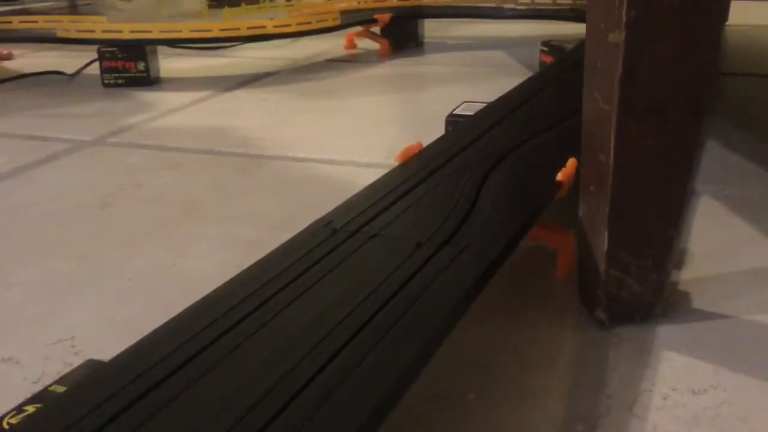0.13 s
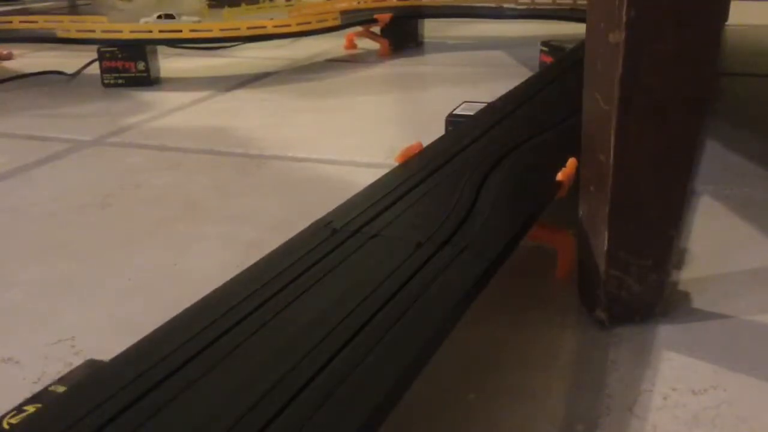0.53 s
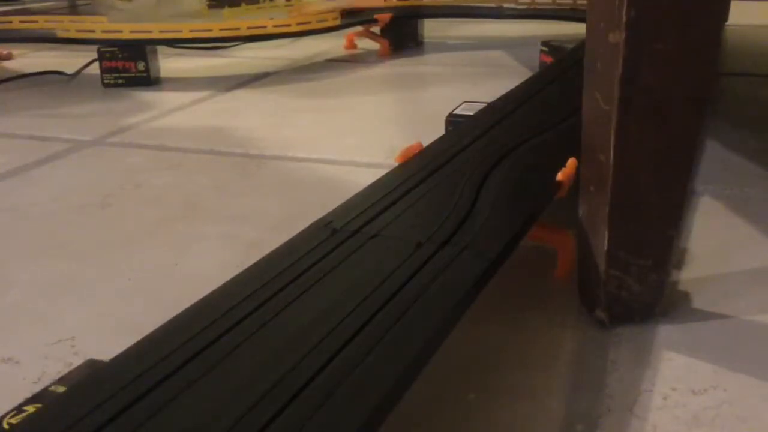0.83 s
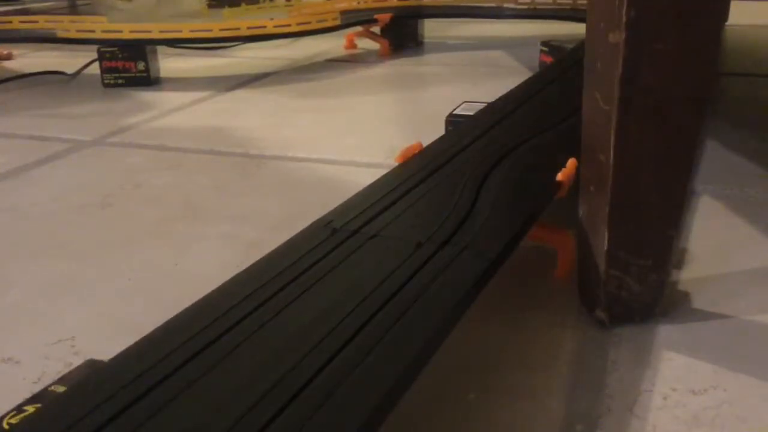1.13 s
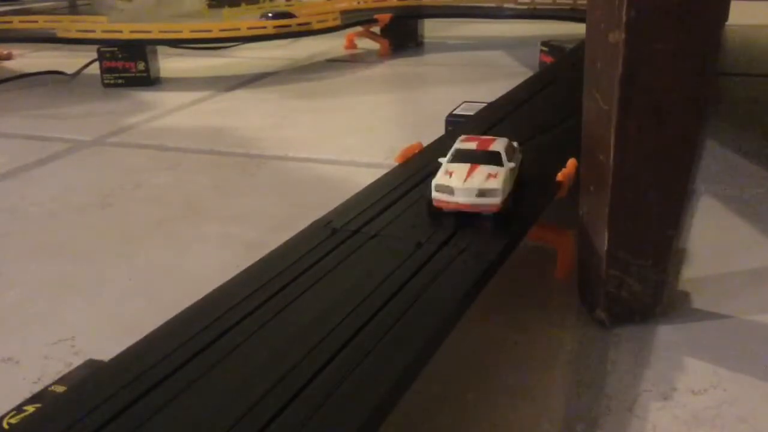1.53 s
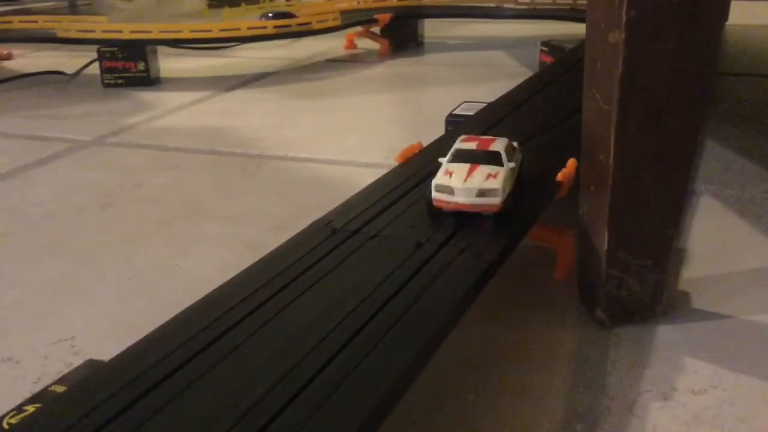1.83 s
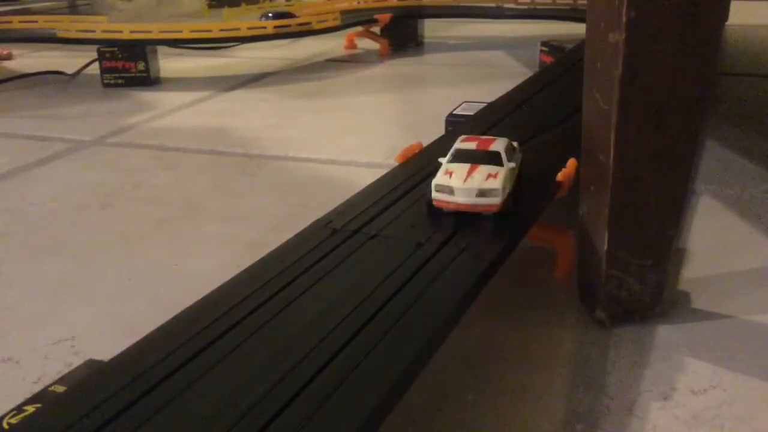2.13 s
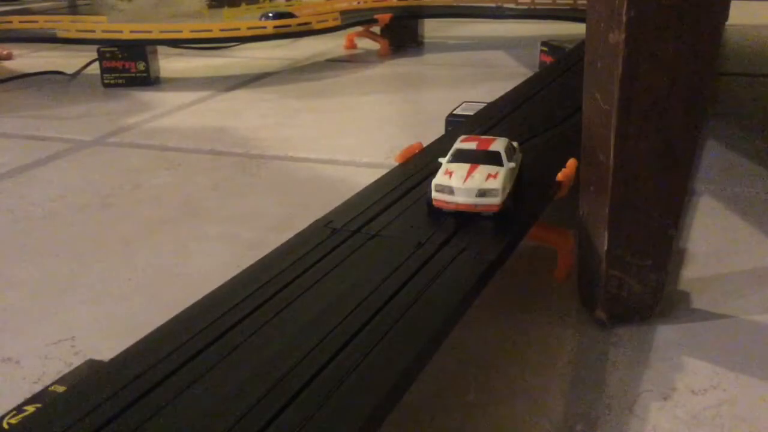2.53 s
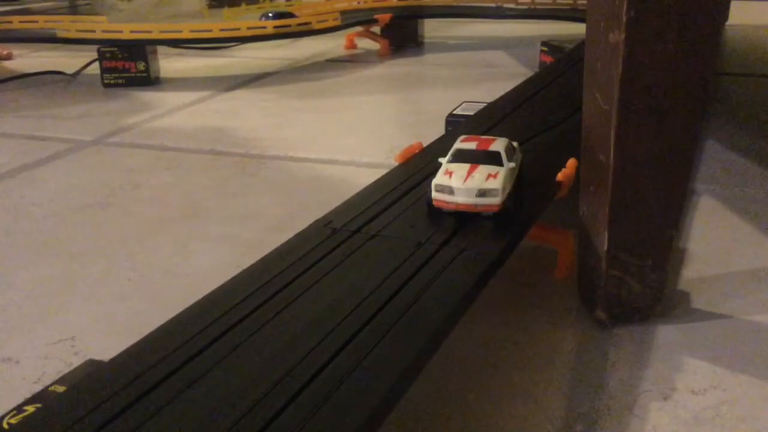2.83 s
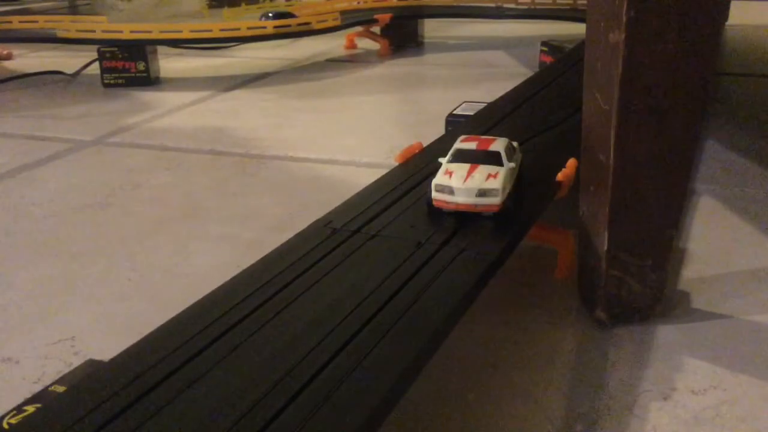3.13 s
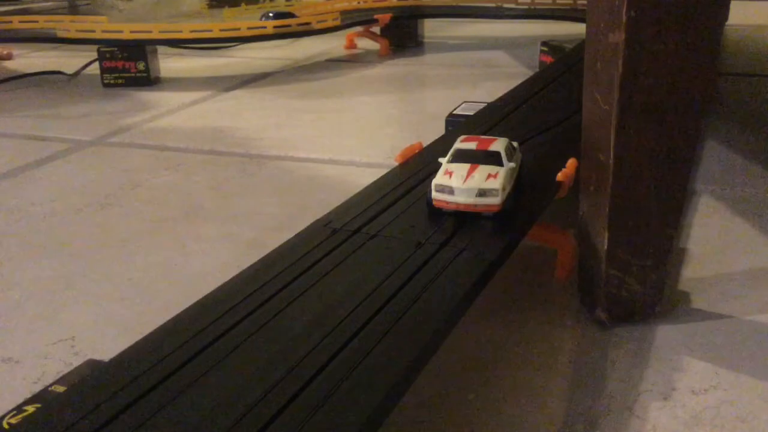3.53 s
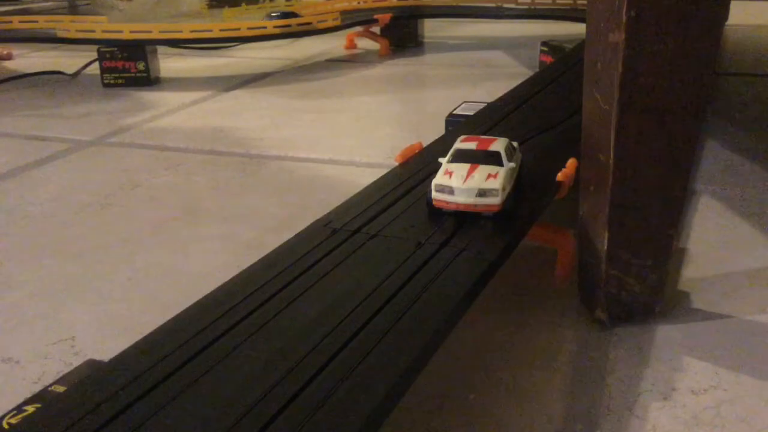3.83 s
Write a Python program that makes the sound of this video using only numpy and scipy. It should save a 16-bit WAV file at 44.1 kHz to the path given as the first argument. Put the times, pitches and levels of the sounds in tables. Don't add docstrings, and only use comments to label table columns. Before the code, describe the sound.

A toy slot car whirs and rattles along plastic track twice, then stops, leaving faint rumble.

```python
import sys
import numpy as np
from scipy import signal
from scipy.io import wavfile

SR = 44100
rng = np.random.default_rng(int(sys.argv[2]) if len(sys.argv) > 2 else 0)


def undo_db(level):
    steps = np.asarray(level, float) / 20
    return 10 ** steps


def digitize_waveform(pressure):
    field = np.atleast_2d(pressure).T
    bounded = np.clip(field, -1, 1)
    quanta = np.round(bounded * 32767).astype(np.int16)
    wavfile.write(sys.argv[1], SR, quanta)


N = 176400
T = np.arange(N) / SR

# f/Hz, width/Hz, level/dB
BODY = [(284.3, 25, -10.5), (337, 87, -11), (407, 110, -12.5), (918, 370, -6), (1400, 200, -9),
        (1566, 57, -8.5), (1737, 180, -2.5), (1960, 110, 0), (2150, 220, -6), (3700, 360, -14),
        (4360, 400, -18), (7100, 860, -16)]


def rms_one(x):
    return x / np.sqrt(np.mean(x ** 2) + 1e-20)


def in_time(rows):
    s, *columns = np.transpose(rows)
    return [np.interp(T, s, column) for column in columns]


def drift(rate_hz):
    step = 20
    r = np.exp(-2 * np.pi * step * rate_hz / SR)
    noise = rng.standard_normal(N // step + 3002)
    slow = signal.lfilter([1], [1, -2 * r, r * r], noise)[3000:]
    return np.interp(np.arange(N) / step, np.arange(len(slow)), rms_one(slow))


def resonate(x, hz, width_hz):
    r = np.exp(-np.pi * width_hz / SR)
    feed = np.array([1, 0, -1]) * (1 - r * r) / 2
    return signal.lfilter(feed, [1, -2 * r * np.cos(2 * np.pi * hz / SR), r * r], x + 1e-18)


def bandpass(x, order, low_hz, high_hz):
    return signal.sosfilt(signal.butter(order, [low_hz, high_hz], "band", fs=SR, output="sos"), x)


def bands(spectrum, patchy_db, moving_db, size=N):
    hz, db = np.transpose(spectrum)
    white = rng.standard_normal((2, size + SR // 2))
    out, power = np.zeros(N), 0
    edges = 9.35 * 2 ** np.arange(0, 11, .4)
    for k, (low, high) in enumerate(zip(edges, edges[1:])):
        mid = np.sqrt(low * high)
        if not hz[0] / 1.2 < mid < hz[-1] * 1.3:
            continue
        gain = undo_db(np.interp(np.log(mid), np.log(hz), db))
        band = bandpass(white[k % 2], 3, low, high)[SR // 2:]
        flicker_db = patchy_db * np.clip(drift(12)[:size], -2, 2) / (1 + mid / 9000)
        out[:size] += gain * band * undo_db(flicker_db + moving_db(mid)[:size])
        power += gain ** 2 * (high - low) * 2 / SR
    return out / np.sqrt(power)


def tones(rows, wobble_db):
    out = np.zeros(N)
    for s, length, hz, db, glide in rows:
        span = slice(int(s * SR) + 1, int((s + length) * SR))
        age = T[span] - s
        swell, sway = drift(20)[span], drift(20)[span]
        edge = np.sin(np.pi * age / length) ** 0.48
        turn = 2 * np.pi * (hz + glide * age / 2) * age
        out[span] += undo_db(db + 3.5 + wobble_db * swell) * edge * np.sin(turn + 0.18 * wobble_db * sway)
    return out


def tilt(hz, bright_db, boom_db, tyre_db):
    octaves = np.log2(hz / 2000)
    treble = bright_db * np.clip(5.0 * octaves - .9, 0, 1.5 + .2 * octaves)
    bass = boom_db * np.clip(-octaves / 2, 0, 1)
    return treble + bass + tyre_db * np.exp(-((octaves + 1.2) / .8) ** 2)


def car():
    # t/s, level/dB, nearness as brightness/dB, load as boom/dB, tyre rumble/dB
    effort = [
        [(0, -38.5, 5, -3, 3.5), (.07, -38, 0.5, 2.5, -4.5), (.2, -39, 1, 5.5, -3), (.37, -40, 3, 6, -2),
         (.44, -34, 1, -0.5, 0.5), (.51, -39.5, 3.5, -1, 1.5), (.59, -54, 2, 3.5, 3), (.68, -57.5, -1, 8.5, 0),
         (.76, -60.5, 7.5, 11.5, 2.5)],
        [(.81, -43.5, 0, -2, 10.5), (.92, -39.5, 1, 0.5, -6), (.97, -40, 2, 3, 1.5), (1.14, -37, -0.5, -3, -2),
         (1.19, -37.5, 1.5, -4, -4), (1.28, -43, 1.5, 4.5, 0), (1.41, -45.5, 4, 6, -2.5),
         (1.5, -62.5, 3, 6.5, 1), (1.62, -78.5, 8.5, 25, -4)],
    ]
    # f/Hz, level per Hz/dB
    hiss_colour = [(71, -52.5), (120, -18.5), (334, -3), (670, -8.5), (2150, -1.5), (3110, -12.5),
                   (3740, -17), (5190, -21), (16000, -25.5)]
    # f/Hz, width/Hz, level/dB
    track_modes = [(520, 13.4, -15), (938, 24, -11.5), (1306, 25, -19), (1752, 29, -9), (2106, 24.2, -6.5)]
    contacts_per_s, contact_spread_db = 1200, 3.0
    hiss_db, track_db, rattle_db = -3.5, -5.5, -8.5

    level_db, bright_db, boom_db, tyre_db = in_time(effort[0] + effort[1])
    bright_db = bright_db + 0.17 * (level_db + 40.5)

    def colour(hz):
        return tilt(hz, bright_db, boom_db, tyre_db)

    hiss = bands(hiss_colour, 3.5, colour, size=N // 2)
    sizes = undo_db(contact_spread_db * np.minimum(rng.exponential(1, N), 4)) * rng.choice([-1, 1], N)
    clicks = sizes * (rng.random(N) < contacts_per_s * undo_db(3 * drift(30)) / SR)

    def rung(hz, width):
        return rms_one(resonate(clicks * rng.standard_normal(N), hz, width))

    rattle = sum(undo_db(db + colour(hz)) * rung(hz, width) for hz, width, db in BODY)
    track = sum(undo_db(db + 5 * drift(4.1) + colour(hz)) * rung(hz, width) for hz, width, db in track_modes)
    return undo_db(level_db) * (undo_db(hiss_db) * hiss + undo_db(track_db) * track + undo_db(rattle_db) * rattle)


def gear():
    # t/s, centre f/Hz, level/dB
    mesh = [
        [(0, 3700, -50), (.4, 3900, -52.5), (.48, 4000, -33), (.56, 3760, -61.5), (.7, 3670, -96)],
        [(.79, 3520, -85), (.83, 3520, -46.5), (.92, 3941, -47), (1.0, 3800, -55), (1.25, 3757, -57.5),
         (1.4, 3762, -48), (1.52, 3604, -77.5)],
    ]
    hz, db = in_time(mesh[0] + mesh[1])
    half_width = signal.butter(2, 410, fs=SR, output="sos")
    rough = signal.sosfilt(half_width, rng.standard_normal((2, N)))
    turn = 2 * np.pi * np.cumsum(hz) / SR
    whine = rms_one(rough[0] * np.cos(turn) + rough[1] * np.sin(turn))
    return undo_db(db - 2.5 + 2.62 * drift(23.4)) * whine


def live_room():
    # f/Hz, level/dB
    hum_tones = [(88, -70.5), (180, -59)]
    # f/Hz, level per Hz/dB
    air_colour = [(12, -74.5), (20, -46.5), (81, -7), (145, -19), (181, -1), (620, -8), (2240, -26.5),
                  (2570, -30), (15800, -44.5)]
    hum = np.zeros(N)
    for hz, db in hum_tones:
        hum += undo_db(db - 1.0 + 4.0 * drift(10.0)) * np.sin(2 * np.pi * hz * T + 0.94 * drift(3.3))
    fading_db = -150 * np.maximum(T - 1.42, 0)

    def fade(hz):
        return np.maximum(fading_db, -22 / (1 + (hz / 4000) ** 2) - 6)

    return undo_db(-63) * bands(air_colour, 1.5, fade, size=N // 2) + hum


def joints():
    # t/s, peak level/dB, brightness/dB
    joint_hits = [(0.004, -25.5, 6.5), (0.111, -26, 6), (0.139, -15.5, -0.5), (0.235, -24.5, -5),
                  (0.308, -16.5, -4), (0.401, -24.5, 6.5), (0.447, -17, -12), (0.473, -21, -4),
                  (0.485, -29, 0), (0.5, -22, 4), (0.798, -35, 0), (0.806, -26, 5), (0.879, -30.5, 5),
                  (1.011, -18, -3.5), (1.1561, -12, 3.5), (1.321, -30, 0)]
    attack_s, t60_s, tail_t60_s, tail_db = .0007, 0.015, 0.17, -1.5
    body_db, crack_db = -24.5, -21.5
    knock, crack = np.zeros(N), np.zeros(N)
    for s, db, bright_db in joint_hits:
        span = slice(int(s * SR) + 1, int((s + .4) * SR))
        age = T[span] - s
        decay = undo_db(-60 * age / t60_s) + undo_db(tail_db - 60 * age / tail_t60_s)
        shape = np.minimum(age / attack_s, 1) * undo_db(db) * decay
        knock[span] += shape
        crack[span] += shape * undo_db(bright_db)
    body = np.zeros(N)
    for hz, width, db in BODY[:11]:
        body += undo_db(db) * resonate(knock * rng.standard_normal(N), hz, width) * np.sqrt(SR / width)
    top = bandpass(crack * rng.standard_normal(N), 2, 5300, 15000)
    return undo_db(body_db) * body + undo_db(crack_db) * top


def ring(s, db, hz, t60_s):
    out = np.zeros(N)
    span = slice(int(s * SR) + 1, int((s + t60_s * 2) * SR))
    age = T[span] - s
    out[span] = undo_db(db - 60 * age / t60_s) * np.minimum(age * hz, 1) * np.sin(2 * np.pi * hz * age)
    return out


def ticks():
    # t/s, peak level/dB, f/Hz
    contacts = [(.020, -29, 1515), (.114, -25, 1960), (.1395, -16.5, 1980), (0.1446, -23, 1790),
                (.173, -23.5, 1920), (0.3082, -29, 1570), (.401, -37, 2040), (0.4143, -25, 1910),
                (0.432, -31, 1860), (.4475, -26, 1760), (0.474, -24, 2000), (.501, -28, 1500),
                (.512, -24.5, 1300), (0.7684, -41, 2100), (.798, -31.5, 1820), (.810, -31, 1860),
                (1.011, -23.5, 2000), (1.051, -22, 1900), (1.137, -28, 2080), (1.1565, -17.5, 1810),
                (1.164, -23, 1630), (1.264, -29, 1300), (1.322, -30, 1890), (1.409, -29, 1570)]
    out = np.zeros(N)
    for s, db, hz in contacts:
        out += ring(s, db, hz, .018)
        out += ring(s, db - 9, 1000 * rng.uniform(0.66, 1.2), .015)
    return undo_db(-2.5) * out


def dipped(x):
    # f/Hz, width/Hz, depth/0-1
    weak_spots = [(3140, 530, 0.4), (5180, 510, 0.3), (11600, 2500, 0.5)]
    for hz, width, depth in weak_spots:
        x = x - np.clip(depth, 0, 1) * resonate(x, hz, width)
    return signal.sosfilt(signal.butter(2, 110, "high", fs=SR, output="sos"), x)


def motor_whirs():
    # start t/s, length/s, f/Hz, level/dB, glide/Hz per s
    notes_sung = [(.17, .13, 300, -48, 600), (.33, .08, 355, -45, -100), (.56, .065, 285, -48, 0),
                  (.4, .035, 2000, -37, -3000), (.425, .035, 1800, -35, -300), (.78, .1, 420, -50, -200),
                  (.915, .035, 350, -43, -300), (.885, .035, 1770, -41, 0), (1.05, .09, 1215, -46, 200),
                  (1.15, .17, 1560, -51, -100), (1.2, .045, 350, -44, 0), (1.22, .18, 740, -53, -150),
                  (1.345, .09, 430, -51, 100), (1.31, .08, 1950, -48, -3500), (1.46, .07, 440, -58, 0),
                  (1.17, .04, 1960, -39, 900), (1.06, .07, 2150, -45, -900),
                  (1.335, .08, 3750, -57, -10000), (1.375, .1, 1580, -55, -400), (.95, .045, 930, -48, 0),
                  (.68, .05, 2300, -58, -1000), (.6, .1, 1680, -60, 0), (1.37, .05, 3600, -59, -8000),
                  (.05, .11, 880, -53, 300), (.18, .06, 1990, -46, 400), (1.3, .07, 310, -49, 0)]
    return tones(notes_sung, 3.2)


def room_rumble():
    # f/Hz, level per Hz/dB
    rumble_colour = [(7.1, -13.0), (12, 2.0), (34, -12), (82, -25), (140, -20.5), (204, -30), (291, -30),
                     (545, -41.0), (1750, -49.0), (2280, -82), (3850, -120)][:-2]
    # t/s, level/dB
    swell_points = [
        (1.55, -58),
        (1.75, -59),
        (2.1, -66),
        (2.9, -72),
        (3.4, -66),
        (4, -60),
    ]
    swell_db, = in_time(swell_points)

    def swell(hz):
        return (swell_db + 71.5) * 1.2 * (hz > 50) / (1 + (hz / 466) ** 2)

    return undo_db(-59.5) * bands(rumble_colour, 2.8, swell)


def far_engine():
    # t/s, f/Hz, level/dB
    engine_run = [
        (1.55, 36, -55),
        (1.95, 35.46, -58),
        (2.15, 35.01, -64.5),
        (3.4, 26.94, -57),
        (3.56, 28.51, -43),
        (3.7, 30.12, -43),
        (3.8, 32.64, -38.5),
        (4, 32.43, -37.5),
    ]
    # multiple of the turning rate, level/dB
    orders = [(1, 0), (3.5, -25), (5, -22.5), (6.3, -20.5), (7.6, -26), (8.6, -23), (13, -33)]
    hz, db = in_time(engine_run)
    turn = 2 * np.pi * np.cumsum(hz) / SR
    load_db = 58 * np.minimum(T - 3.91, 0)
    out = np.zeros(N)
    for multiple, order_db in orders:
        change_db = (multiple > 1) * (2.6 * drift(10.0) + load_db)
        out += undo_db(db + 2.5 + order_db + change_db) * np.sin(multiple * turn)
    return out


def passing_drones():
    # start t/s, length/s, f/Hz, level/dB, glide/Hz per s
    passes = [
        (3.1, 0.64, 75, -58.5, 12),
        (2.8, 0.56, 170, -67, -1.5),
        (3.5, 0.22, 58, -51, 29.5),
        (0.88, .45, 170, -69, -15),
        (3.6, 0.19, 140, -58.5, 147.5),
    ]
    return tones(passes, 1.9)


def quiet_room():
    x = room_rumble() + far_engine() + passing_drones()
    return signal.sosfilt(signal.ellip(10, .5, 60, 1830, fs=SR, output="sos"), x)


def scene():
    live = dipped(car() + gear() + joints() + ticks()) + motor_whirs() + live_room()
    live_gain = np.clip((1.625 - T) / 0.0059, 0, 1)
    quiet_gain = np.clip((T - 1.53) / 0.038, 0, 1)
    return (live * live_gain + quiet_room() * quiet_gain)[None]


def low_pass(x):
    return signal.sosfilt(signal.butter(12, 16920, fs=SR, output="sos"), x)


def record(dry):
    mix = signal.sosfilt(signal.ellip(12, .5, 70, 15850, fs=SR, output="sos"), dry)
    return low_pass(mix)


dry = scene()
out = record(dry)
digitize_waveform(out)
```